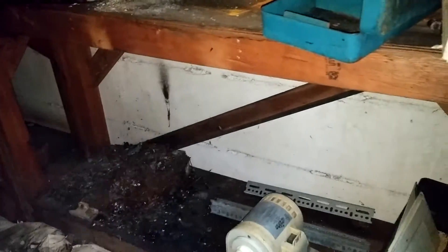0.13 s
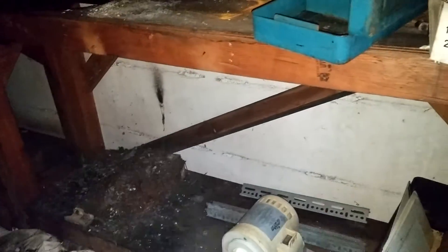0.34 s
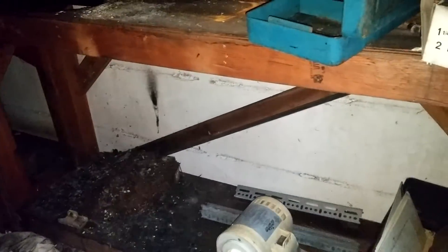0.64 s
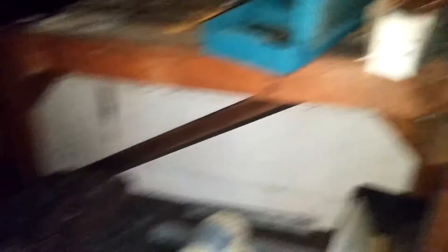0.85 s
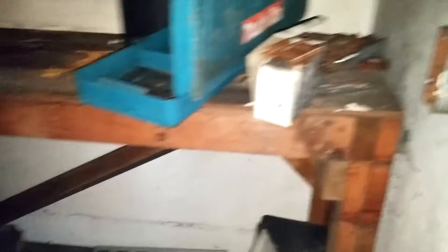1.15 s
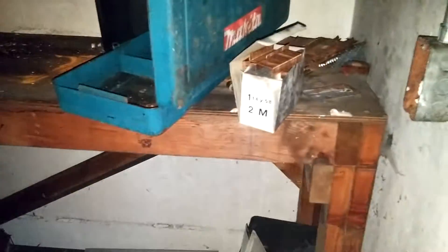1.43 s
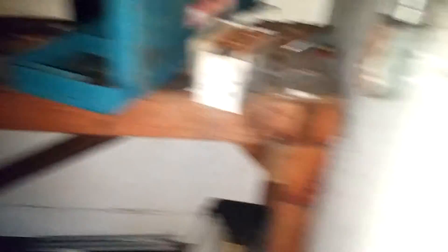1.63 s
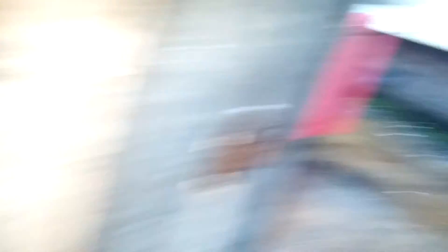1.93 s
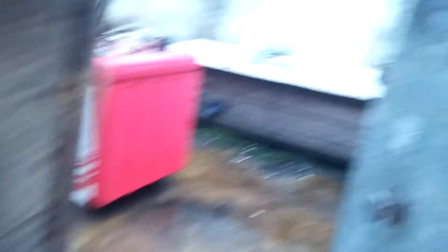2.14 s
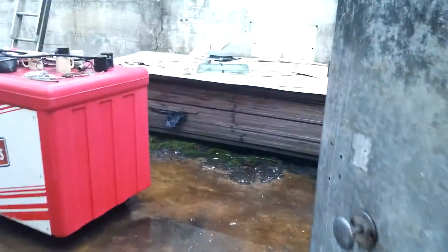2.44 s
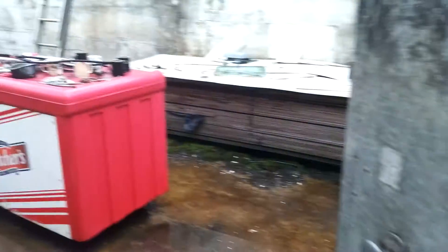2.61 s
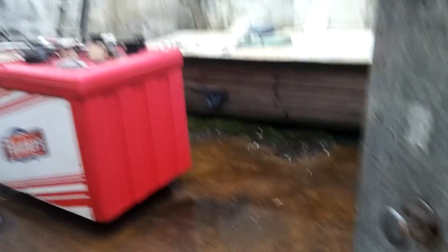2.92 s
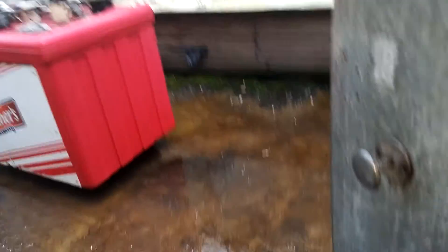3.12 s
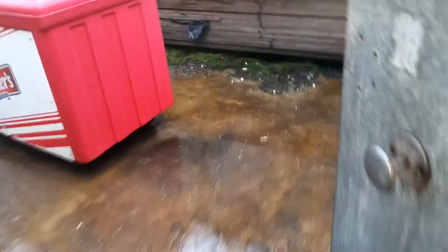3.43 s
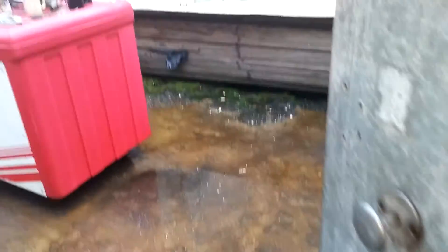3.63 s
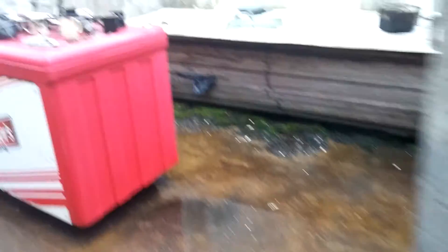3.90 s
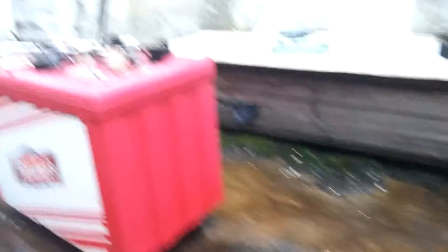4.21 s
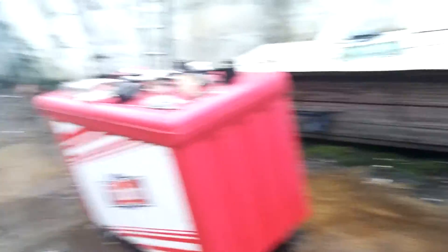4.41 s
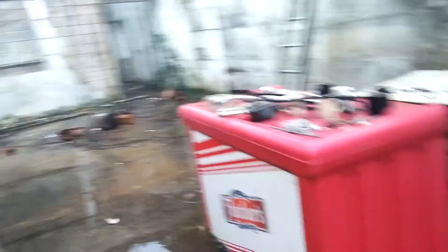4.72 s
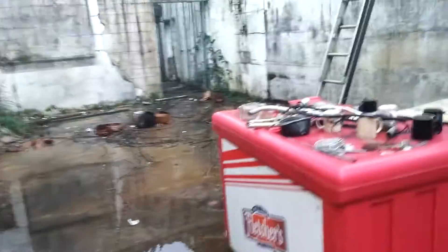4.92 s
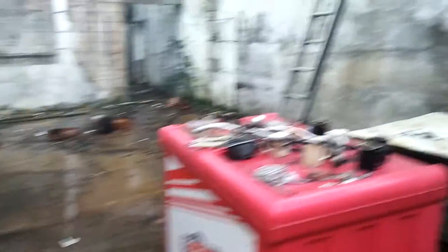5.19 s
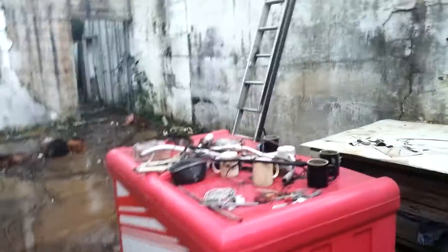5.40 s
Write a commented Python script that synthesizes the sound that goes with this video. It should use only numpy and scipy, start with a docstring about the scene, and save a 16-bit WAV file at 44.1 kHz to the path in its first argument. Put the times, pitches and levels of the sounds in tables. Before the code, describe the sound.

Slow footsteps crunch on gritty debris, with sharp shard snaps and hollow knocks, quiet at first and then suddenly loud and brittle.

```python
"""Grit crunches under the soles of someone walking over grit, shards and loose scraps in a shed.
Crunch: flaring coloured noise plus short pings of breaking chips. Hollow scraps pop and knock:
a sinking blow, then ringing modes. Shards snap and rubbed pieces tinkle: resonated noise.
Footfalls shake the hand-held camera: a low narrow-band rumble. Quiet hiss lies under all of it."""
import sys
import numpy as np
from scipy import signal
from scipy.io import wavfile
from scipy.ndimage import uniform_filter1d

SR = 44100
rng = np.random.default_rng(int(sys.argv[2]) if len(sys.argv) > 2 else 0)


def store_wav(level_fs):
    """Save 16-bit WAV to argv[1]."""
    pcm = np.round(np.clip(np.atleast_2d(level_fs), -1, 1) * 32767)
    wavfile.write(sys.argv[1], SR, pcm.T.astype(np.int16))


N = 245019


def gain_of(db):
    """Amplitude factor of a level in dB."""
    return 10 ** (np.asarray(db) / 20)


def evened(x):
    """Scales to an RMS of 1."""
    return x / np.sqrt(np.mean(x ** 2) + 1e-20)


def read(points, hz):
    """Interpolates a (frequency, value) curve over log frequency."""
    point_hz, value = np.transpose(points)
    return np.interp(np.log(hz + 1), np.log(point_hz + 1), value)


def sides(pan_db):
    """Left and right gains for a left-right level difference."""
    return gain_of(np.array([pan_db, -pan_db]) / 2)


def add(mix, start_s, sound):
    """Adds a stereo sound into the mix in place, cut at the end."""
    part = mix[:, round(start_s * SR):][:, :sound.shape[1]]
    part += sound[:, :part.shape[1]]


def blend(levels_db, values):
    """Adds the powers of overlapping events; a quality follows whichever is loudest."""
    power = gain_of(levels_db) ** 2
    total = power.sum(axis=0)
    return 10 * np.log10(total), [(power * v).sum(axis=0) / total for v in values]


# Stereo likeness of noise: (frequency [Hz], left-right correlation [0-1])
LIKENESS = [(50, 0.49), (200, 0.69), (400, 0.77), (800, 0.12), (1500, 0.015), (12000, 0.0087)]


def coloured(x, spectrum_db, size=256):
    """Filters noise by a dB field over (Hz, s) with random patches; makes the sides partly alike."""
    overlap = size * 3 // 4
    hz, t, z = signal.stft(x, SR, nperseg=size, noverlap=overlap)
    same = np.clip(read(LIKENESS, hz), 0, 1)[:, None]
    # random patches make the noise uneven over time and frequency
    patches = uniform_filter1d(rng.standard_normal(z[0].shape), size=3, axis=0)
    patches = evened(uniform_filter1d(patches, size=14, axis=1))
    gain = gain_of(spectrum_db(hz[:, None], t) + 2.2 * patches)
    gain = gain / np.sqrt(np.mean(gain ** 2, axis=0))  # only the shape of the spectrum counts
    right = same * z[0] + np.sqrt(1 - same ** 2) * z[1]
    z = np.array([z[0], right]) * gain
    return signal.istft(z, SR, nperseg=size, noverlap=overlap)[1][:, :N]


def random_sizes(per_s, spread_db):
    """Strikes at random moments, a few of them large."""
    size = gain_of(spread_db * np.minimum(rng.exponential(1, N), 4))
    return size * (rng.random(N) < per_s / SR)


def grains(per_s, spread_db, t60_s, share):
    """Noise that flares at random moments, a few flares large, over an even rustle."""
    decay = gain_of(-60 / t60_s / SR)
    flares = evened(signal.lfilter([1], [1, -decay], random_sizes(per_s, spread_db)))
    share = np.clip(share, 0, .5)
    return (np.sqrt(1 - share) + share * flares) * rng.standard_normal((2, N))


def resonate(x, hz, width_hz):
    """Gliding resonance: shifts the curve hz down to zero, smooths twice, and shifts back."""
    turn = np.exp(2j * np.pi * np.cumsum(hz) / SR)
    r = np.exp(-np.pi * width_hz / SR)
    smoothed = signal.lfilter([1], np.convolve([1, -r], [1, -r]), x / turn)
    return (turn * smoothed).real


# Hiss spectrum shape: (frequency [Hz], relative density [dB per Hz])
HISS_SPECTRUM = [(35, -34.5), (60, -11), (489, -22), (697, -15.5), (1230, -31.5), (2200, -23.5),
                 (13000, -42), (16800, -40)]
HISS_DB = -70.5


def hiss():
    """Quiet air and microphone noise."""
    noise = rng.standard_normal((2, N))
    return gain_of(HISS_DB) * coloured(noise, lambda hz, u: read(HISS_SPECTRUM, hz) + 0 * u, size=1024)


WALLS_T60_S, WALLS_DB = 0.41, -9.5


def walls(x):
    """Sparse echoes of random sign from floor and walls, other ones on each side."""
    length, step = SR // 2, 20
    taps = np.zeros((2, length))
    grid = np.arange(100, length - step, step)
    at = grid + rng.integers(0, step, (2, len(grid)))
    np.put_along_axis(taps, at, rng.choice([-1., 1.], at.shape), 1)
    taps *= gain_of(-60 * np.arange(length) / SR / WALLS_T60_S)
    return signal.fftconvolve(x, taps / np.linalg.norm(taps[0]), axes=1)[:, :N]


# Footfalls jolting the camera:
# (peak time [s], level [dB], fade [dB/s], centre [Hz], left-right difference [dB])
CAMERA_JOLTS = [(2.048, -61, 56, 64, -11), (2.41, -49.5, 69, 150, 1.5), (2.68, -35.5, 63.5, 133.5, 0.5),
                (3.117, -39, 103, 121.5, -0.5), (3.91, -40.5, 61.5, 143, 0), (4.21, -36, 139, 121, 0.5),
                (5.207, -42, 95, 80.9, -24.5)]
JOLT_RISE_DB_PER_S = 500.5
# Slow sway of the hand: (time [s], level [dB])
HAND_SWAY = [(0, -62), (.28, -77), (2.3, -63.5), (3.76, -62), (4.53, -64), (5.0, -57.5), (5.1, -54),
             (5.56, -56.5)]
SWAY_HZ, SWAY_PAN_DB = 73.4, -3


def shake():
    """Low noise, nearly alike on both sides; jolts swell fast, pull the centre, fade into the sway."""
    at, peak_db, fade, jolt_hz, jolt_pan_db = np.transpose(CAMERA_JOLTS)[:, :, None]
    s = np.arange(0, N / SR, .002)
    since = s - at
    jolts_db = peak_db + np.minimum(JOLT_RISE_DB_PER_S * since, -fade * since)
    sway_db = np.interp(s, *np.transpose(HAND_SWAY))
    levels_db = np.vstack([np.maximum(jolts_db, -200), sway_db])
    centres_hz = np.vstack([jolt_hz, [SWAY_HZ]])
    pans_db = np.vstack([jolt_pan_db, [SWAY_PAN_DB]])
    db, (hz, pan_db) = blend(levels_db, [centres_hz, pans_db])
    t, noise = np.arange(N) / SR, rng.standard_normal((2, N))
    stereo = noise[0] + 0.083 * noise[1] * np.array([[1], [-1]])
    low = resonate(stereo, np.interp(t, s, hz), 73)
    low = signal.sosfilt(signal.butter(4, 42, "high", fs=SR, output="sos"), low)
    # flatten the noise so that the push sets the level
    steady = low / np.sqrt(uniform_filter1d((low ** 2).mean(axis=0), 1800) + 1e-9)
    return steady * gain_of(np.interp(t, s, db)) * sides(np.interp(t, s, pan_db))


# Pieces rubbed by the sole, from dull scuffs to a thin shard:
# (width [Hz], rows of (time [s], level [dB], pitch [Hz]))
RUBBED_PIECES = [(80, [(.225, -69, 1583), (.29, -59, 1618), (.32, -65, 1570)]), (350, [(.49, -57, 450),
                 (.535, -48, 400), (.62, -66, 327)]), (700, [(.484, -53.5, 2340), (.54, -57, 2260),
                 (.6, -67, 2390)]), (700, [(.716, -54, 2500), (.736, -61, 2500)]), (200, [(.79, -57.5, 280),
                 (.85, -68, 260)]), (400, [(1.062, -46, 2850), (1.145, -57, 2860)]),
                 (700, [(1.062, -34, 4240), (1.1, -46.5, 4170), (1.152, -63, 4200)]),
                 (250, [(1.545, -55, 2060), (1.568, -73, 2060)]), (150, [(1.635, -56, 860),
                 (1.71, -70, 1150), (1.81, -50.5, 1160), (1.86, -64, 1200)]), (80, [(1.94, -52.5, 3520),
                 (1.975, -57, 3590), (2.065, -55.5, 3440)]), (450, [(2.37, -38, 5300), (2.41, -30.5, 5280),
                 (2.5, -46, 5200)]), (150, [(2.398, -28, 2880), (2.428, -34, 2800)]),
                 (151, [(2.588, -18.5, 1410), (2.615, -39, 1420)]), (220, [(2.6, -33, 4940),
                 (2.645, -30, 5150), (2.7, -52, 5180), (2.96, -46, 4860)]), (240, [(4.272, -35.5, 5160),
                 (4.33, -49, 5180), (4.42, -64, 5150)]), (151, [(4.722, -54.5, 3210), (4.8, -65, 3210)]),
                 (200, [(4.47, -51.5, 594), (4.52, -50.5, 810), (4.57, -55, 1033)]),
                 (260, [(4.79, -57, 383), (4.865, -47.5, 894)]), (170, [(4.87, -65, 1000), (4.94, -49, 924),
                 (5.05, -62, 910)]), (557, [(5.203, -26, 2230), (5.235, -42, 3020), (5.43, -52.5, 2380)]),
                 (1000, [(5.203, -32.5, 9000), (5.26, -38, 9000), (5.36, -53, 9100)])]
SING_HZ = 130  # narrower pieces squeak with some steady tone


def tinkles():
    """Grit keeps rubbing one piece, which rings in its own band."""
    out, strikes = np.zeros((2, N)), grains(300, 2.6, .006, .3)
    for width_hz, rows in RUBBED_PIECES:
        s, db, hz = np.transpose(rows)
        t = np.arange(s[0], s[-1], 1 / SR)
        pitch_hz = np.interp(t, s, hz)
        rubbing = strikes[:, round(s[0] * SR):][:, :len(t)]
        ring = evened(resonate(rubbing, pitch_hz, width_hz))
        tone = np.sqrt(2) * np.sin(2 * np.pi * np.cumsum(pitch_hz) / SR)
        sings = np.clip(1 - width_hz / SING_HZ, 0, 1)
        level = gain_of(np.interp(t, s, db)) * signal.windows.tukey(len(t), .15)
        add(out, s[0], ((1 - sings) * ring + sings * tone) * level)
    return out


# Shards snapping: (time [s], nominal peak [dB], pitch [Hz], t60 [s], left-right difference [dB])
SHARD_SNAPS = [(1.232, -10.5, 8950, 0.061, -4), (2.214, 0.5, 9800, 0.022, -2.5),
               (2.488, -17.5, 9500, 0.03, -18), (2.609, -1.5, 9300, 0.066, -11),
               (2.665, -11, 9100, 0.049, -7), (2.7282, -9.5, 9600, 0.05, -2), (2.81, -22.5, 4970, 0.21, 4),
               (2.8777, -7.5, 3800, 0.073, 4), (2.911, -12.5, 10200, 0.028, -1.5),
               (2.988, -15.5, 4470, 0.056, 1), (3.0084, -20.5, 5700, 0.037, 14.5),
               (3.0826, -2, 9650, 0.049, -1), (3.225, -23.5, 3630, 0.051, 8),
               (3.324, -17.5, 3770, 0.039, 8), (3.4206, -18.5, 3720, 0.14, 0),
               (3.5853, -17, 5200, 0.05, 0.5), (3.667, -19.5, 4620, 0.041, 6),
               (3.922, -10.5, 10150, 0.07, -25.5), (3.927, -5, 10100, 0.028, 12.5),
               (3.96, -4, 4500, 0.049, 0.5), (4.0036, -10.5, 9700, 0.028, -14),
               (4.177, -19.5, 7540, 0.05, 0), (4.198, -21.5, 4240, 0.12, 4.5), (4.252, -20, 4500, 0.23, 3),
               (5.0817, -28.5, 14000, 0.11, 16.5), (5.1977, 0.5, 10060, 0.035, -3.5)]
CREST_DB = 16  # assumed peak of a noise burst above its mean level


def snaps():
    """A burst of splinters: noise that rings broadly around the shard's pitch."""
    out, t = np.zeros((2, N)), np.arange(8000) / SR
    noises = rng.standard_normal((len(SHARD_SNAPS), 2, 8000))
    attack = 1 - np.exp(-t / .0006)
    for (s, db, hz, t60_s, pan_db), noise in zip(SHARD_SNAPS, noises):
        rung = signal.lfilter(*signal.iirpeak(min(hz, 15000), 4.5, SR), noise)
        wide = signal.lfilter(*signal.butter(2, 3000, "high", fs=SR), noise)
        decay = gain_of(-60 * t / max(t60_s, .004))
        burst = (evened(rung) + 0.04 * wide) * attack * decay
        add(out, s, sides(pan_db)[:, None] * gain_of(db - CREST_DB) * burst)
    return out


# Hollow scraps popping and heels landing:
# (time [s], nominal peak [dB], pitch [Hz], blow length [cycles of the pitch], left-right difference [dB])
SCRAP_KNOCKS = [(2.589, -16, 1470, 1.9, -5), (2.664, -20, 243, 1.07, 0.5), (2.663, -24.5, 855, 3.5, 0),
                (2.687, -19.5, 942, 2.7, -2), (2.729, -10, 999, 2.44, -2), (2.741, -39, 920, 3.4, -1),
                (2.824, -21, 1065, 0.89, -4), (2.843, -22, 1030, 4.5, 0), (2.8514, -8.5, 1026, 2.38, -2.5),
                (2.924, -32.5, 910, 4.4, 0), (2.989, -28, 970, 1.7, 0), (3.03, -34.5, 940, 2.5, 0),
                (3.06, -30, 1000, 1.9, -12), (3.0826, -3, 1065, 3.16, 1.5), (3.227, -22, 1050, 2.8, -2.5),
                (3.324, -18, 1035, 3.24, 0), (3.357, -32.5, 1000, 1.45, 2), (3.4, -34, 1040, 4, -5),
                (3.421, -21, 1430, 1.55, -4), (3.447, -35.5, 1000, 1.6, 0), (3.667, -30.5, 2395, 2.8, -21),
                (3.859, -35, 1115, 2.5, -1.5), (3.8716, -20.5, 1330, 3.6, -2.5),
                (3.914, -17, 1410, 2.6, -5), (3.956, -17.5, 1560, 1.84, -17.5),
                (3.975, -18, 1520, 1.6, -10), (4.006, -19.5, 2800, 6.1, 0), (4.013, -23, 1700, 2, -7),
                (4.022, -19.5, 1720, 2.1, -7), (4.126, -28.5, 2000, 2.8, -12), (4.199, -29.5, 634, 5.2, -6),
                (4.199, -32.5, 105, 6.8, -1), (4.253, -28, 1050, 2, 2), (4.267, -34.5, 1430, 7.2, -6),
                (5.063, -31, 1700, 1.6, -2), (5.09, -35, 955, 1.9, -3), (5.141, -37, 62, 2, -32),
                (5.1983, -4.5, 1625, 1.81, -0.5), (5.227, -26, 2480, 5.5, 3), (5.249, -25.5, 2400, 12, -4)]
# Modes of a scrap: (ratio to the pitch, level [dB], t60 at low pitch [s])
SCRAP_MODES = [(0.777, -18.5, 0.018), (0.998, -16.5, 0.074), (1.62, -8.5, .02)]
RING_HZ = 1150  # scraps pitched above this are smaller and ring shorter
LAG_S = 0.000091  # the left port hears the ground a little later
BOUNCE_S, BOUNCE_DB = .0034, -8  # the floor throws each knock back once


def knocks():
    """A blow starts hard, sinks in pitch and bounces off the floor; the scrap's modes die away."""
    out = np.zeros((2, N))
    t = np.maximum(np.arange(4000) / SR - np.array([[LAG_S], [0]]), 0)
    for s, db, hz, cycles, pan_db in SCRAP_KNOCKS:
        part = np.clip(t * hz / max(cycles, 1), 0, 1)  # share of the blow gone by
        swell = np.sin(np.pi * part ** 0.57)
        blow = -swell * np.sin(2 * np.pi * hz * t * (1.3 - 0.26 * part))
        shorter = max(hz / RING_HZ, 1) ** 3
        ring = 0
        for ratio, mode_db, t60_s in SCRAP_MODES:
            decay = gain_of(mode_db - 60 * t / t60_s * shorter)
            ring = ring + decay * np.sin(2 * np.pi * ratio * hz * t)
        add(out, s, sides(pan_db)[:, None] * gain_of(db) * (blow + part * ring))
        add(out, s + BOUNCE_S, sides(-pan_db)[:, None] * gain_of(db + BOUNCE_DB) * blow)
    return out


# The sole crushes loose ground, a burst and then settling:
# (peak time [s], rise [s], fine grit burst [dB], coarse rubble burst [dB], settling grit [dB],
#  settling rubble [dB], settling fade [dB/s], grit tilt [dB/octave], rubble tilt [dB/octave])
SOLE_CRUSHES = [(.505, 0.054, -78, -67, -67.5, -51, 66, -14, -5.5),
                (1.064, 0.0068, -31.5, -77, -40.5, -56.5, 37, -4.5, 0),
                (1.229, 0.0033, -38, -73, -38.5, -57.5, 114, 4, 0),
                (2.217, 0.0028, -30.5, -49, -42, -52, 41, 1, -3.5),
                (2.374, 0.019, -43, -33, -30.5, -60.5, 98, -4, 4.5),
                (2.412, 0.13, -41, -52, -27, -34.5, 111, -6, 2),
                (2.591, 0.004, -35, -47, -30.5, -42, 147.5, -5, 12),
                (2.615, 0.05, -18, -25.5, -26, -31, 128, -5.5, 3.5),
                (2.728, 0.0043, -35, -26, -40.5, -42, 27.5, -6, -1),
                (2.851, 0.006, -28.5, -21.5, -35.5, -40.5, 60.5, -5, 1.5),
                (3.083, 0.0037, -25, -20, -37, -29.5, 153, -8, 0),
                (3.227, 0.0027, -41.5, -39, -86, -54.5, 53.5, -5, 1.5),
                (3.322, 0.0036, -36.5, -34, -42.5, -44, 114, -8.5, 2.5),
                (3.423, 0.0021, -34.5, -32.5, -40.5, -39, 63, -9, -1.5),
                (3.585, 0.0072, -35, -51, -44, -56, 139, 2, -2),
                (3.669, 0.0063, -49, -37, -45.5, -71, 69.5, -4.5, 20.5),
                (3.871, 0.01, -62, -32, -51.5, -41, 58.5, 0.5, -1),
                (3.925, 0.016, -23, -36, -29, -31.5, 43, -7.5, 2.5),
                (4.046, 0.022, -38, -48, -52, -36.5, 78.5, -9.5, 1.5),
                (4.198, 0.022, -33.5, -32, -41, -41, 72.5, -2.5, 3),
                (4.254, 0.012, -39, -39, -54, -56, 44, 3.5, 7),
                (5.084, 0.018, -51, -47, -54.5, -51, 22, -4.5, -0.5),
                (5.199, 0.002, -27, -58, -40.5, -48, 46, -4.5, -2)]
BURST_DB_PER_S, RISE_DB = 611.5, 36  # decay of a burst; climb within one rise time
# Moments the recorder's gate cuts the tails of earlier crushes: (time [s])
GATE_CLOSINGS = [1.147, 1.32, 2.449, 3.523, 3.628, 3.722, 4.056, 4.347]
GATE_DROP_DB, GATE_DROP_S = 4, 0.0029  # depth and duration of one drop


def tread(t, peak_db, settle_db, tilt, rustle_db, rustle_tilt):
    """Level and tilt of one debris kind: every crush rises, bursts and settles over the rustle."""
    s, rise_s, fade = np.transpose(SOLE_CRUSHES)[[0, 1, 6], :, None]
    since = t - s
    rise_db = RISE_DB * np.minimum(since, 0) / np.maximum(rise_s, .002)
    after = np.maximum(since, 0)
    burst_db = peak_db[:, None] + rise_db - BURST_DB_PER_S * after
    # a closing cuts only the tails of crushes before it
    gated = sum((s < closing) * np.clip((t - closing) / GATE_DROP_S, 0, 1) for closing in GATE_CLOSINGS)
    tail_db = settle_db[:, None] + rise_db - fade * after - GATE_DROP_DB * gated
    levels_db = np.vstack([burst_db, tail_db, rustle_db[None]])
    tilts = np.vstack([np.tile(tilt, 2)[:, None] + 0 * t, rustle_tilt[None]])
    db, (mixed_tilt,) = blend(np.maximum(levels_db, -200), [tilts])
    return db, mixed_tilt


CHIPS_PER_S, CHIPS_DB, CHIP_CYCLES = 350, -7, 80  # a chip loses 60 dB in CHIP_CYCLES


def chips(spectrum, top_hz):
    """Small hard chips break at random, left or right, each with a short ping of its own pitch."""
    t, out = np.arange(3000) / SR, np.zeros((2, N))
    size = random_sizes(CHIPS_PER_S, 5.1)
    pitches = np.geomspace(top_hz / 10, top_hz, 40) * rng.uniform(0.99, 1.03, 40)
    which = rng.integers(0, len(pitches), N)
    side = rng.integers(0, 2, N) == np.array([[0], [1]])
    for k, hz in enumerate(pitches):
        decay = gain_of(read(spectrum, hz) - 60 * t * hz / CHIP_CYCLES)
        ping = decay * np.sin(2 * np.pi * hz * t) * hz / pitches[-1]
        out += signal.oaconvolve(size * (which == k) * side, ping[None], axes=1)[:, :N]
    return gain_of(CHIPS_DB) * evened(out)


# Fine grit spectrum shape: (frequency [Hz], relative density [dB per Hz])
GRIT_SPECTRUM = [(1290, -43), (2200, -18.5), (2780, -8.5), (4080, -6), (5290, -4), (7830, -5.5), (9490, -1),
                 (12600, -1.5), (15200, 6), (16200, -13.5)]
# Coarse rubble spectrum shape: (frequency [Hz], relative density [dB per Hz])
RUBBLE_SPECTRUM = [(110, -42.5), (180, 3.5), (243, -10.5), (363, 2.5), (489, -1.5), (609, -4.5), (811, 1),
                   (2470, -0.5), (2780, -4), (4000, -16.5), (5200, -40), (8800, -120)]
# Faint rustle between the crushes:
# (time [s], fine grit [dB], grit tilt [dB/octave], coarse rubble [dB], rubble tilt [dB/octave])
FAINT_RUSTLE = [(0, -48, -7, -52.5, -5.5), (.04, -59, -6.5, -64.5, -1), (.15, -65.5, -5.5, -63.5, -4),
                (.47, -67.5, -5, -68, -2), (.8, -67.5, -5.5, -62, -1.5), (1.0, -61.5, -2, -65.5, -5),
                (1.62, -66, -6, -66.5, -0.5), (1.78, -55.5, -7.5, -51.5, -2), (1.92, -52.5, -5, -54.5, -1),
                (1.96, -49, -4, -57.5, -0.5), (2.2, -49.5, -2, -61.5, -2), (3.8, -57, -8, -57.5, 0.5),
                (4.4, -57.5, -6, -52, -1.5), (4.53, -52.5, -2, -52, -1), (4.62, -57, -4, -59, -1),
                (4.821, -53.5, -4, -55, 0.5), (4.95, -60.5, -6.5, -50, 1), (5.05, -61.5, -7.5, -57, -0.5),
                (5.556, -83, -14, -56, 1.5)]
DULLING_DB_PER_OCTAVE = 25.5  # above 11 kHz at full hardness: a hard tread loses the finest fizz


def crunch():
    """Fine grit fizzes high, coarse rubble rustles lower; a harder tread breaks more single pieces."""
    rows, bed = np.transpose(SOLE_CRUSHES), np.transpose(FAINT_RUSTLE)
    s, t = np.arange(0, N / SR, .001), np.arange(N) / SR
    bed = [np.interp(s, bed[0], column) for column in bed[1:]]
    grit_db, grit_tilt = tread(s, rows[2], rows[4], rows[7], bed[0], bed[1])
    rubble_db, rubble_tilt = tread(s, rows[3], rows[5], rows[8], bed[2], bed[3])
    grit_db, rubble_db = np.interp(t, s, grit_db), np.interp(t, s, rubble_db)
    hard = np.clip((grit_db + 54.0) / 22, 0, 1)  # 0 soft, 1 hard tread

    def grit_field(hz, u):
        tilt = np.interp(u, s, grit_tilt) * np.log2(np.clip(hz, 2500, 11000) / 7000)
        octaves_above = np.log2(np.maximum(hz / 11000, 1))
        dulling = DULLING_DB_PER_OCTAVE * np.interp(u, t, hard) * octaves_above
        return read(GRIT_SPECTRUM, hz) + tilt - dulling

    def rubble_field(hz, u):
        tilt = np.interp(u, s, rubble_tilt) * np.log2(np.clip(hz, 250, 3500) / 900)
        return read(RUBBLE_SPECTRUM, hz) + tilt

    grit = coloured(grains(300, 4.5, .01, .4 * np.sqrt(hard)), grit_field)
    rubble = coloured(grains(170, 4.5, .01, .46 * np.sqrt(hard)), rubble_field, size=512)
    grit = grit + hard * chips(GRIT_SPECTRUM, 13980)
    rubble = rubble + hard * chips(RUBBLE_SPECTRUM, 4487)
    return gain_of(grit_db) * grit + gain_of(rubble_db) * rubble


def scene():
    """Knocks and snaps with their wall echoes, plus the dry layers."""
    hits = knocks() + snaps()
    echoes = gain_of(WALLS_DB) * walls(hits)
    return hiss() + shake() + tinkles() + hits + echoes + crunch()


# Expander curve: (level [dB], gain [dB])
EXPANDER_CURVE = [(-63, -12), (-55, -7), (-51, -7), (-48, 0)]
# Converter offset ahead of the expander: one row per side, left and right (offset [full scale])
CONVERTER_OFFSET = [
    [-0.0011],
    [-0.002],
]
EDGE_HZ = 16050


def record(dry):
    """An expander turns quiet moments down, so tails stop short; then the band limit."""
    power = abs(uniform_filter1d(dry.mean(axis=0) ** 2, 900))
    level_db = 10 * np.log10(power + 1e-12)
    gain_db = uniform_filter1d(np.interp(level_db, *np.transpose(EXPANDER_CURVE)), 300)
    turned = (dry + CONVERTER_OFFSET) * gain_of(gain_db)
    low_pass = signal.firwin(511, EDGE_HZ, window=("kaiser", 9), fs=SR)
    return signal.oaconvolve(turned, low_pass[None], "same")


dry = scene()
out = record(dry)
store_wav(out)
```